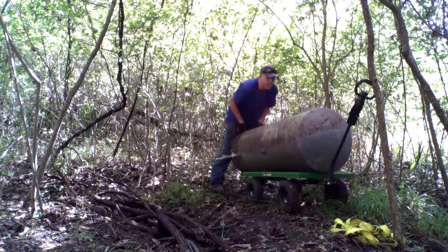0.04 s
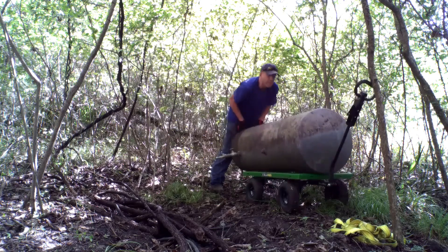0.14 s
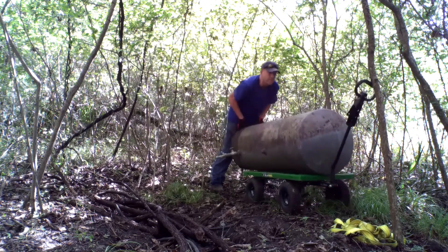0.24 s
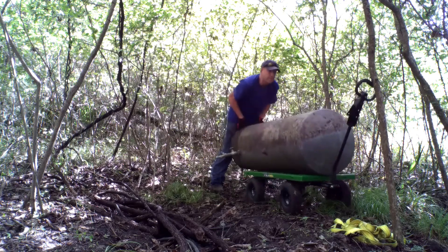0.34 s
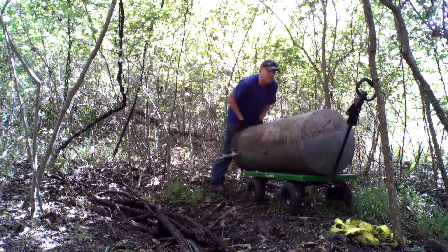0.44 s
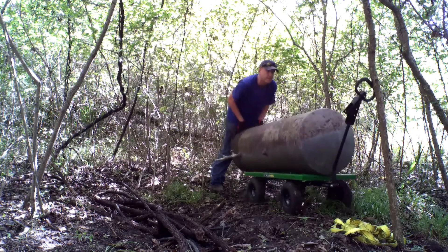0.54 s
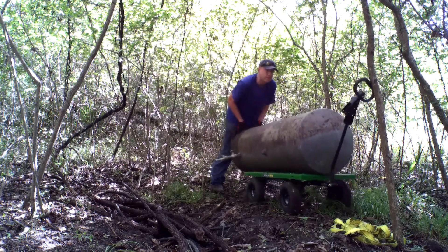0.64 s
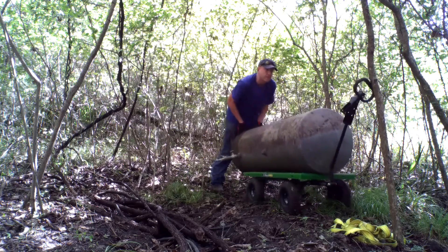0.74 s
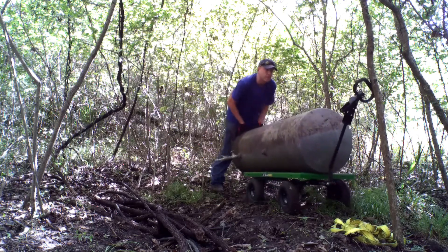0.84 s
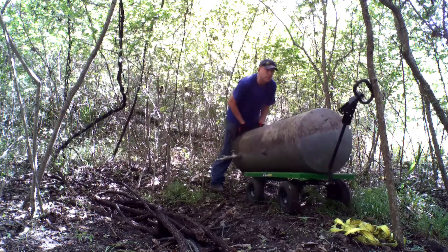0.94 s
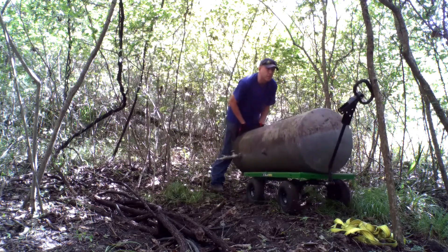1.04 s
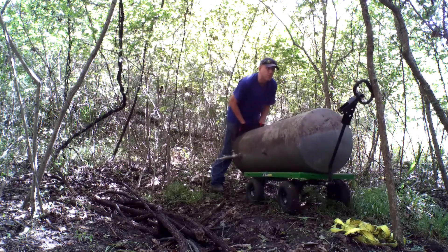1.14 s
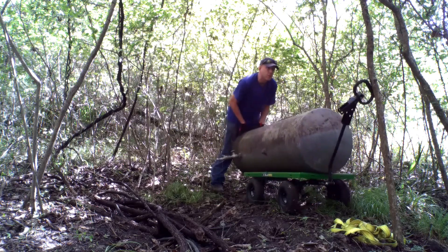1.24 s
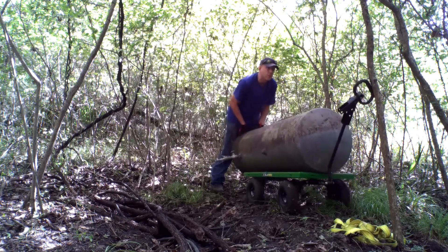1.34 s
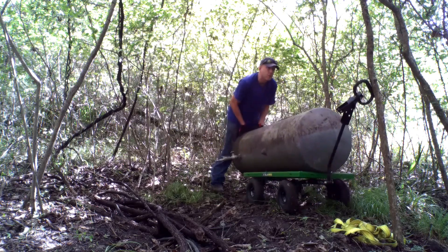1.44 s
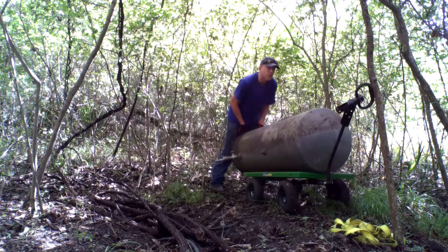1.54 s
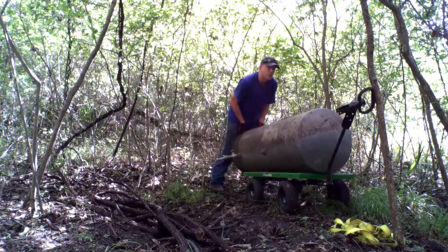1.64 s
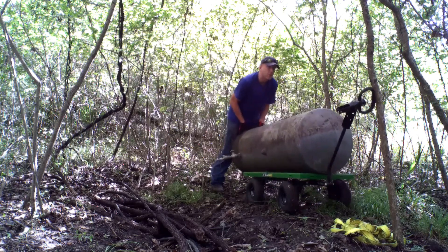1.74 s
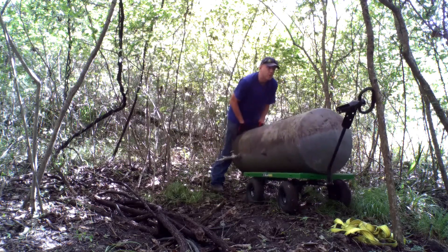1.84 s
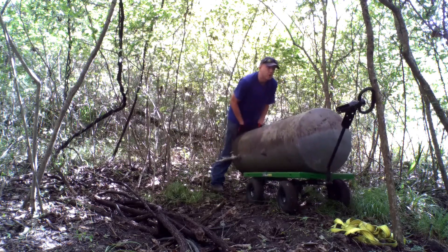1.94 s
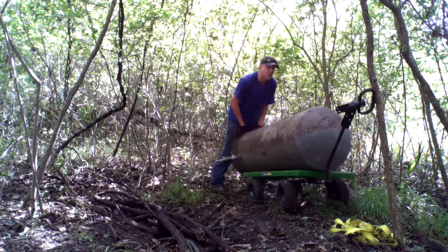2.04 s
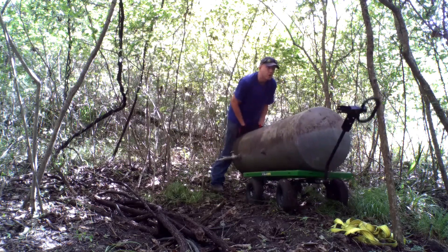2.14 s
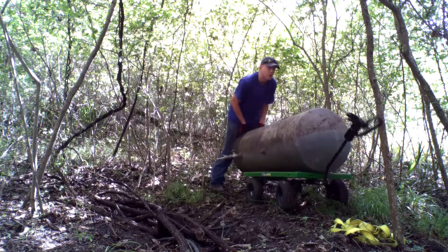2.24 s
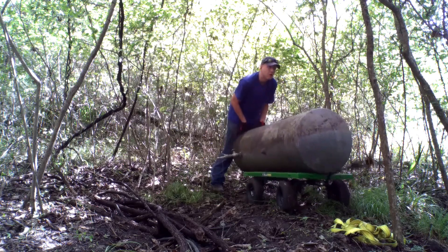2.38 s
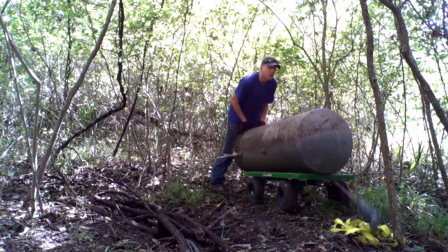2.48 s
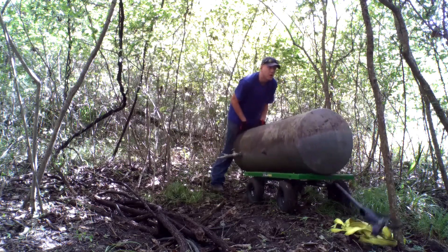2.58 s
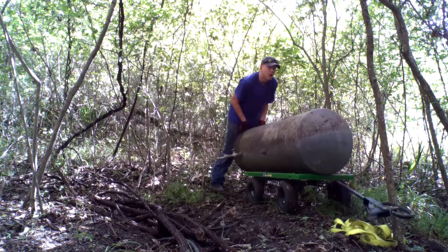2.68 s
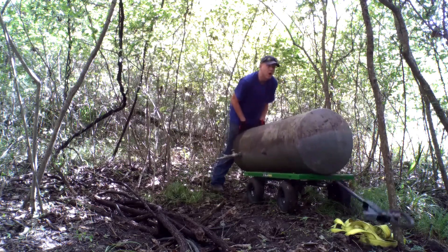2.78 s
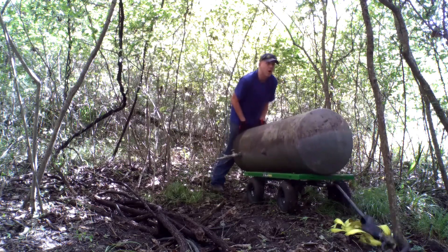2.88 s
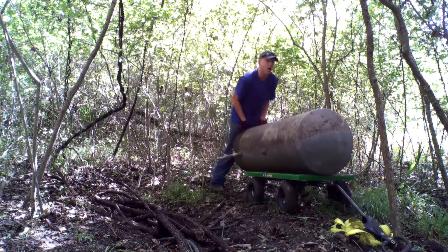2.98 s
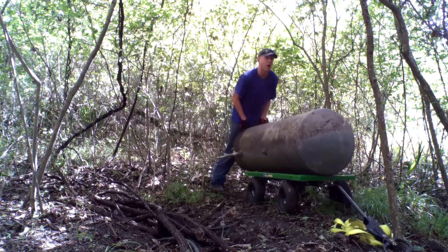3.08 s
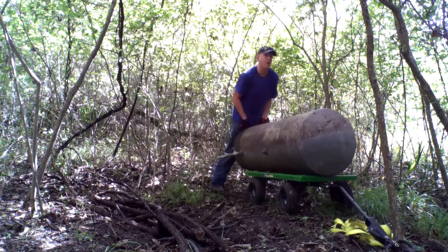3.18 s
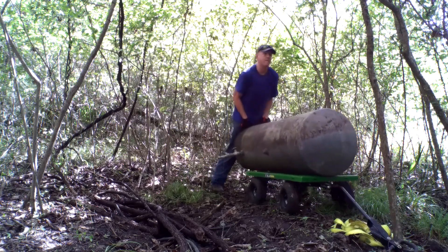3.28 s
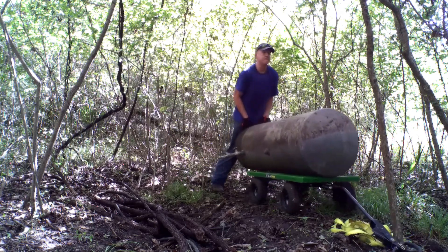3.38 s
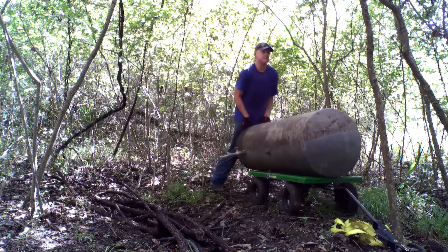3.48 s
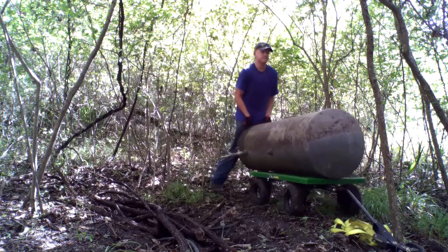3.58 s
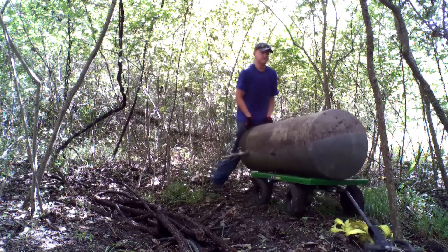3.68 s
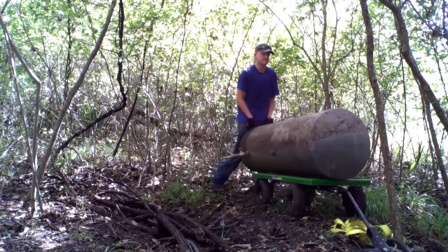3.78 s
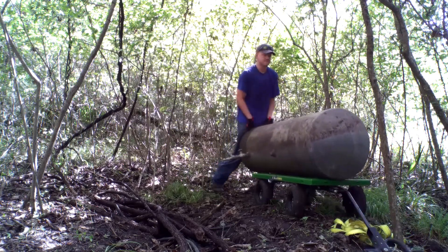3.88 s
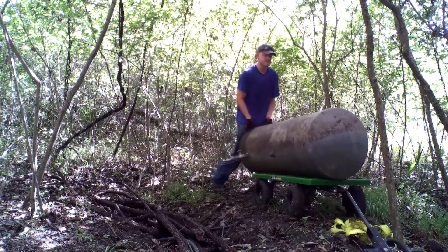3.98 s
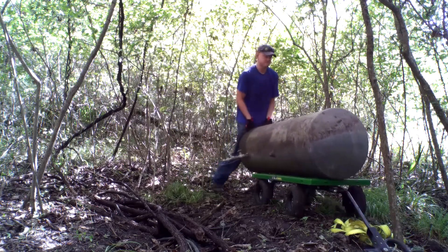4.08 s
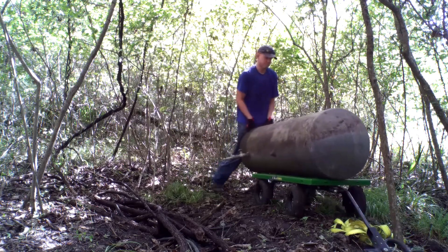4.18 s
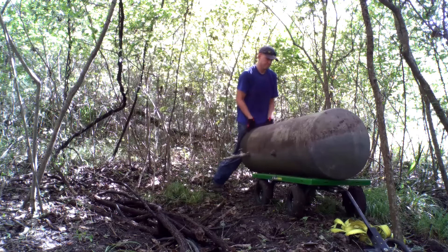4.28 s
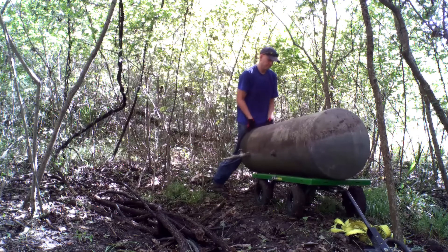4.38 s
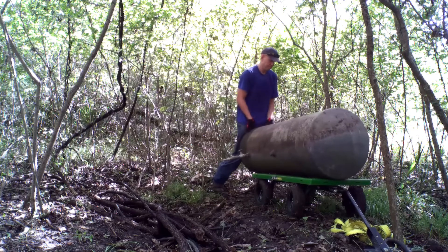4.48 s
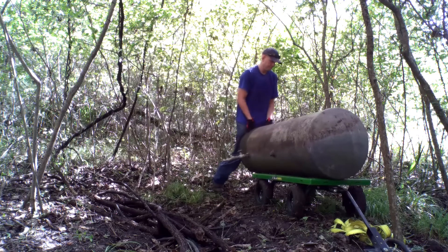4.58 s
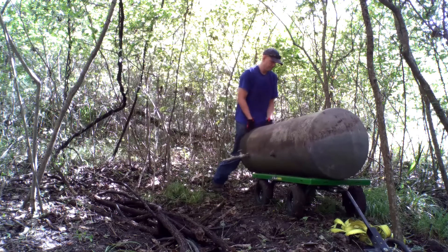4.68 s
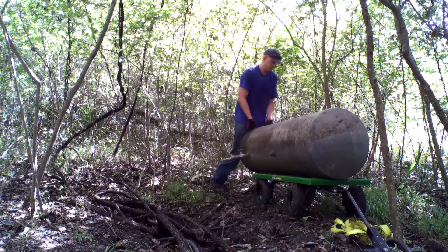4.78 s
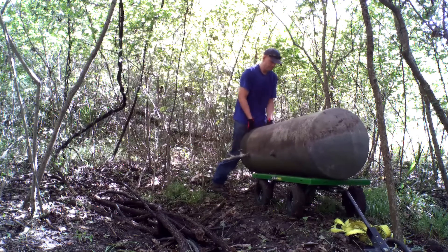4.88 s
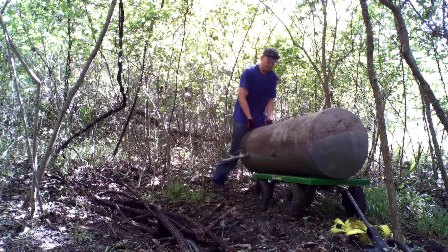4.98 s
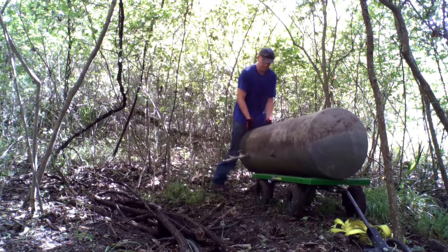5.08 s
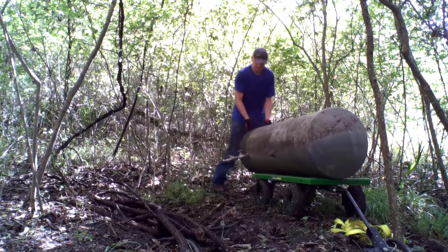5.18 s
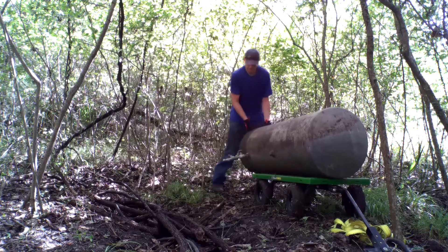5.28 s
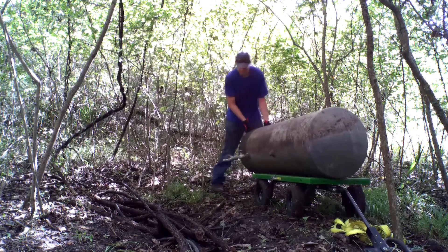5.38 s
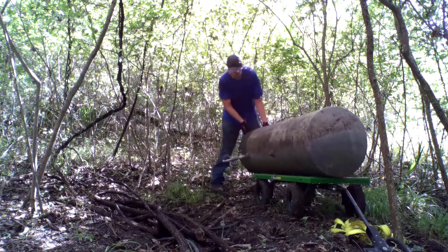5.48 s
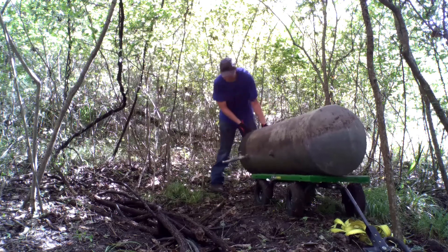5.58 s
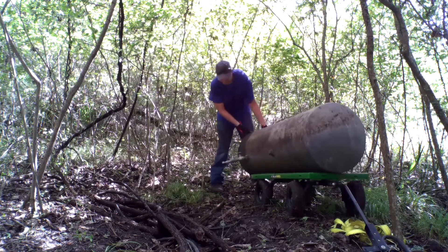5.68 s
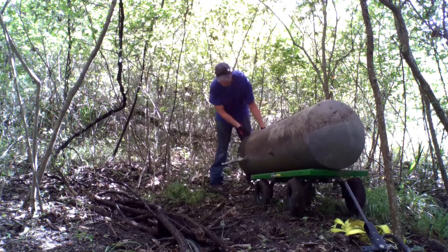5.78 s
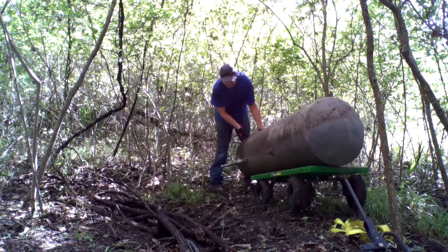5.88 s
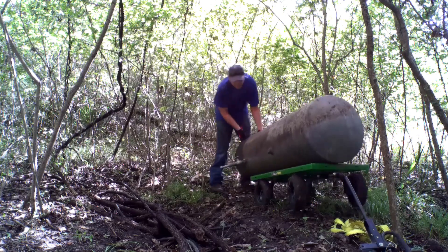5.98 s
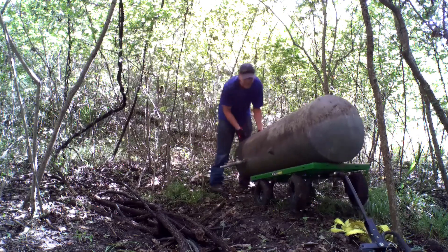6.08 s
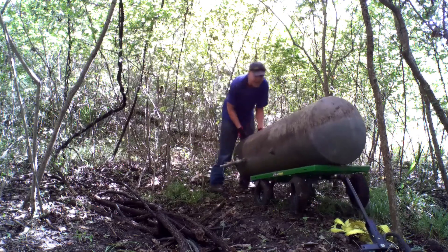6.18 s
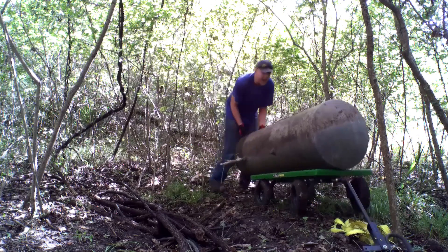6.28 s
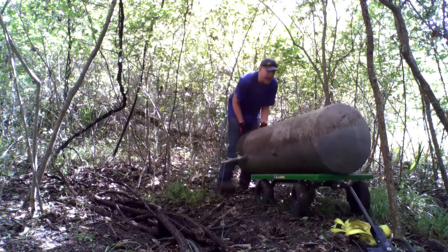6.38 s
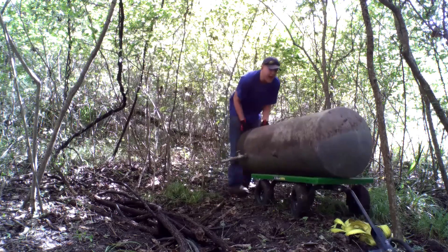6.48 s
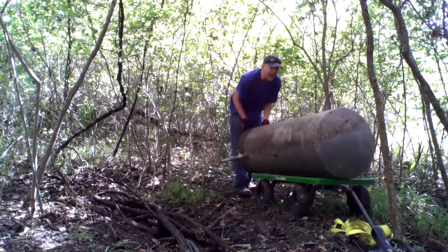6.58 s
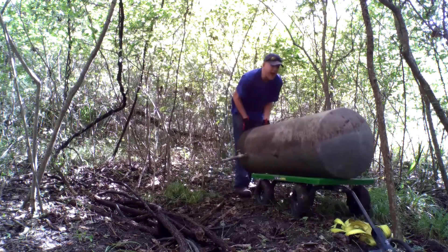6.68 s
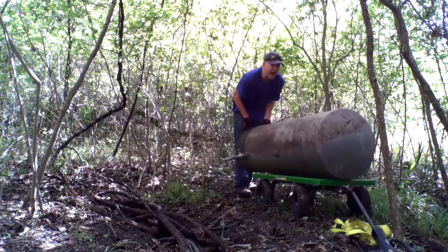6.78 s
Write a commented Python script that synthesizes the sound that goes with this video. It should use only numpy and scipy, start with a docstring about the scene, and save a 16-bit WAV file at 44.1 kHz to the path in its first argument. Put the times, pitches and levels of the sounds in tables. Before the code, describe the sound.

Outdoors among trees, faint rough metal scraping and squeaks, then a falling cart handle clangs sharply twice and clatters, followed later by dull metallic knocks.

```python
"""In a wood, a steel tank is shoved along a garden cart, scraping and squeaking faintly.
The cart's upright handle slips off the tank, swings down, clanks on its stop, rebounds and clatters to rest.
Later the tank tips and drops back on the deck. Blows are short noise bursts plus ringing sine waves;
scrapes and squeaks are uneven noise. The trees scatter the cart's sounds, over quiet hiss and a thin whine."""
import sys
import numpy as np
from scipy import signal
from scipy.fft import rfft, irfft, next_fast_len
from scipy.io import wavfile
from scipy.ndimage import uniform_filter1d

SR = 44100
rng = np.random.default_rng(int(sys.argv[2]) if len(sys.argv) > 2 else 0)


def int16_out(signal):
    """Quantize to a 16-bit WAV file."""
    q = np.round(np.clip(np.atleast_2d(signal).T, -1, 1) * 32767)
    wavfile.write(sys.argv[1], SR, q.astype(np.int16))


N = 301122  # length in samples


def amp(db):
    """Turns decibels into a gain."""
    return 10 ** (np.asarray(db) / 20)


def unit(x):
    """Scales a signal to an average strength (rms) of 1."""
    return x / np.sqrt(np.mean(x ** 2) + 1e-20)


def along(points, hz):
    """Reads a curve of (Hz, value) points, joined by straight lines on a log frequency axis."""
    f, v = np.transpose(points)
    return np.interp(np.log(hz + 1), np.log(f + 1), v)


def filtered(x, response):
    """Multiplies the spectrum of x by a gain that depends on frequency."""
    m = next_fast_len(len(x) + 4096)
    spectrum = rfft(x, m) * response(np.fft.rfftfreq(m, 1 / SR))
    return irfft(spectrum, m)[:len(x)]


def noise(size, colour):
    """Noise of rms 1 whose spectrum follows colour(Hz) in dB."""
    return unit(filtered(rng.standard_normal(size), lambda hz: amp(colour(hz))))


def narrow(size, centre_hz, width_hz):
    """Noise of rms 1 gathered around one frequency, heard as a fuzzy tone."""
    peak = lambda hz: 1 / (1 + (2 * (hz - centre_hz) / width_hz) ** 2)
    return unit(filtered(rng.standard_normal(size), peak))


def wobble(size, rate):
    """A random curve: straight lines between random points, rate points a second."""
    knots = rng.standard_normal(int(size * rate / SR) + 4)
    return np.interp(np.arange(size) * rate / SR, np.arange(len(knots)), knots)


def fade(t, t60):
    """Free decay: loses 60 dB in t60 seconds, or in 4 ms if t60 is shorter."""
    return np.exp(-np.log(1000) * t / max(t60, .004))


def hump(hz, centre_hz, width):
    """A bell over log frequency, reaching 1 near its centre."""
    return np.exp(-(np.log((hz + 1) / centre_hz) / width) ** 2)


def add(track, s, sound):
    """Lays a sound into the track at time s in seconds."""
    part = track[max(round(s * SR), 0):][:len(sound)]
    part += sound[:len(part)]


def background():
    """Low outdoor murmur of air and even hiss, both shaped noise, with a thin whine of narrow noise."""
    # spectrum of still air and hiss: f/Hz, level per Hz/dB
    air = [(12, -35), (20, -2), (107, -3), (141, -6), (299, -11), (325, -12.5), (374, -12.5), (537, -14),
           (840, -16.5), (1550, -18.5), (3200, -19.5), (3480, -20), (6990, -19.5), (10300, -18.5),
           (15700, -22.5)]
    # fuzzy lines of the whine: f/Hz, width/Hz, level/dB
    whine_lines = [(7654, 60, -80.5), (10460, 220, -78.5)]
    air_db = -65.5
    whine = sum(amp(db) * narrow(N, hz, width) for hz, width, db in whine_lines)
    return amp(air_db) * noise(N, lambda hz: along(air, hz)) + whine


def shove(s, length):
    """The tank gathers speed, slides evenly and slows down: gain over time."""
    rise_db_per_s, fall_db_per_s = 55, 35
    t = np.arange(N) / SR - s
    before, after = np.minimum(t, 0), np.maximum(t - length, 0)
    return amp(rise_db_per_s * before - fall_db_per_s * after)


def patchy(x, depth_db):
    """Shifting contact points feed some frequencies for a moment and starve others."""
    z = signal.stft(x, nperseg=512)[2]
    # random gains, smoothed over frequency and then over time
    field = uniform_filter1d(rng.standard_normal(z.shape), size=3, axis=0)
    field = uniform_filter1d(field, size=9, axis=1)
    return unit(signal.istft(z * amp(depth_db * unit(field)), nperseg=512)[1][:N])


def sliding():
    """The tank rubs over the deck in uneven slips, which catch on a few resonances and set the fittings buzzing."""
    # each shove slides the tank a little way:
    # t/s, length/s, rasp level before the final trim/dB, fittings' buzz against rasp/dB
    shoves = [(0, .5, -66, -2), (0.75, 0.18, -65.5, 1), (1.583, .06, -74.5, 3), (1.93, .05, -72, 5.5),
              (2.05, .37, -66.5, -4), (3.505, .23, -71, 3), (5.551, 0.51, -76, 1), (6.3, 0.25, -65, -2),
              (6.7, .13, -70, -1.5)]
    # spectrum of the rasp: f/Hz, level per Hz/dB
    rasp_colour = [(60, -11.5), (160, 1.5), (350, -2.5), (700, -4), (1200, -4), (1550, -1.5), (1850, -3),
                   (2350, -1), (3300, -5), (4300, -8), (9000, -17.5)]
    # resonances that the rubbing keeps catching on: f/Hz, level against the rasp/dB
    catch_points = [(1520, -13), (2330, -14), (3250, -11)]
    rasp_gain = np.max([amp(db) * shove(s, length) for s, length, db, _ in shoves], axis=0)
    buzz_gain = np.max([amp(db + buzz_db) * shove(s, length) for s, length, db, buzz_db in shoves], axis=0)
    # slow and fast unevenness together
    slips = amp(1.7 * wobble(N, rate=45) + 1.9 * wobble(N, rate=400))
    rasp = patchy(slips * noise(N, lambda hz: along(rasp_colour, hz)), depth_db=4.5)
    buzz = patchy(slips * narrow(N, centre_hz=6650, width_hz=1200), depth_db=1.0)
    catches = np.zeros(N)
    for hz, db in catch_points:
        grip = amp(9.1 * wobble(N, rate=16))
        catches += amp(db) * unit(grip * narrow(N, hz, width_hz=hz * 0.26))
    return amp(-0.5) * (rasp_gain * (rasp + catches) + buzz_gain * buzz)


def trees(x):
    """Trunks and leaves scatter the sound back: the answer builds up, then fades, with the bass lasting longest."""
    # how long the answer lasts: f/Hz, time to fade by 60 dB/s
    fade_times = [(100, 0.96), (500, .58), (2000, 0.43), (7000, 0.26), (14000, 0.37)]
    hz, t, z = signal.stft(rng.standard_normal(SR), SR, nperseg=256)
    decay = amp(-60 * t / along(fade_times, hz)[:, None])
    build_up = 1 - np.exp(-t / 0.021)
    tail = signal.istft(z * decay * build_up, SR, nperseg=256)[1]
    return signal.fftconvolve(x, tail / np.linalg.norm(tail))[:N]


def squeaks():
    """Short, uneven fuzzy tones: squeaks and groans of rubbed steel, and the ring of one light knock."""
    # short squeaks and groans of rubbed steel; the pair near 5.5 s is the ring of a light knock:
    # t/s, length/s, f/Hz, level before swelling in and out/dB
    moments = [(.03, .081, 1500, -66.5), (1.372, .11, 633, -68.5), (1.567, .092, 767, -69),
               (1.799, .079, 736, -72.5), (2.087, .07, 1600, -67.5), (2.325, .045, 1940, -57.5),
               (5.49, .10, 2300, -66), (5.50, .088, 1240, -69.5), (6.207, 0.074, 1480, -70),
               (6.547, .046, 3500, -65), (6.69, 0.053, 2470, -65)]
    track = np.zeros(N)
    for s, length, hz, db in moments:
        size = int(length * SR)
        swell = np.hanning(size) * unit(amp(2.2 * wobble(size, rate=140)))
        tone = unit(narrow(SR, hz, width_hz=hz * 0.15)[:size])
        add(track, s, amp(db) * swell * tone)
    return track


def crowded_modes(spacing_hz, depth_db):
    """Many close modes make a steel part's response jagged, alike for every blow: (Hz, dB) points."""
    hz = np.arange(0, SR / 2, spacing_hz)
    return np.column_stack([hz, depth_db * rng.standard_normal(len(hz))])


def ring(modes, t, scatter_db):
    """Free modes, struck at new strengths each time: fading sine waves that start at about rms 1 together."""
    chance = rng.standard_normal((len(modes), 2))
    sizes = amp(np.array(modes)[:, 1] + scatter_db * chance[:, 0])
    waves = []
    for (hz, _, t60), phase in zip(modes, chance[:, 1]):
        waves.append(np.sin(2 * np.pi * (hz * t + phase)) * fade(t, t60))
    return sizes @ np.array(waves) / np.sqrt(np.sum(sizes ** 2) / 2)


def blow(jagged, db, zing_hz, thud_db, clang_db, clang_hz, sizzle_db, chatter):
    """One contact: loose steel chatters briefly in its dense modes, while the strong modes ring on."""
    # strong modes of the handle tube and frame, of the steel yoke and its pin, and of the
    # cart's mesh deck: f/Hz, level within the part/dB, time to fade by 60 dB/s
    tube_modes = [(1556, -5.5, .24), (2100, -9, .28), (2125, -2.5, .27), (2450, -7, .42), (2805, -4.5, .33),
                  (3120, -6, 0.39), (3650, -2.5, .24), (4500, -4, .34), (5020, 0, 0.33), (5316, -2, .3),
                  (5760, -2.5, .32), (6200, -0.5, 0.26)]
    fitting_modes = [(6580, -3, 0.43), (6560, -1, 0.32), (6689, 1, .3), (6870, -1, 0.23), (6987, 0.5, .34),
                     (7360, -1, .32), (7252, -6.5, .34), (7360, -3, .3), (7558, 1, 0.19), (7850, -4, 0.19),
                     (7825, -4.5, .28), (8200, -10.5, 0.35), (8590, -13, .25)]
    deck_modes = [(366, -5, 0.37), (493.6, -2, .62), (638, -2.5, .35), (752.5, -2.5, .3)]
    # dense, quickly dying modes of deck, tube, fittings and thin treble: f/Hz, level per Hz/dB
    thud_colour = [(30, -35), (70, -14.5), (150, 0.5), (280, -5.5), (480, 0), (850, -1.5), (1200, -5),
                   (2000, -36)]
    clang_colour = [(600, -29.5), (1200, -5), (1560, 3), (1820, -5.5), (2120, 1), (2700, -1), (4300, -0.5),
                    (5600, 1), (7000, -35.5)]
    zing_colour = [(4000, -39.5), (5900, -7), (6650, -0.5), (7200, -4.5), (7650, -3.5), (8250, -7.5),
                   (8600, -10), (9300, -19.5), (11000, -41.5)]
    sizzle_colour = [(7500, -24), (9900, 9), (11300, -1), (12600, 1.5), (15500, -21)]
    size = SR // 2
    t = np.arange(size) / SR
    chatter_gain = fade(t, chatter) * amp(1.5 * wobble(size, rate=510))
    steel = lambda colour: chatter_gain * noise(size, lambda hz: colour(hz) + along(jagged, hz))
    pumped = np.sqrt(chatter)  # a longer chatter feeds more energy into the ring
    # the place of contact favours one region of the tube's and the fittings' modes
    tube = steel(lambda hz: along(clang_colour, hz) + 11 * hump(hz, clang_hz, width=.09))
    tube += amp(-7.0) * pumped * ring(tube_modes, t, scatter_db=2.5)
    fittings = steel(lambda hz: along(zing_colour, hz) + 6 * hump(hz, zing_hz, width=0.041))
    fittings += amp(-4.5) * pumped * ring(fitting_modes, t, scatter_db=1.5)
    deck = fade(t, chatter * 1.1) * noise(size, lambda hz: along(thud_colour, hz))
    deck += amp(-8.5) * pumped * ring(deck_modes, t, scatter_db=1.5)
    sizzle = steel(lambda hz: along(sizzle_colour, hz))
    # each part's own trim is added to the level asked for
    parts = amp(-9.0) * fittings + amp(clang_db - 4) * tube
    parts += amp(thud_db - 3.5) * deck + amp(sizzle_db - 4.5) * sizzle
    return amp(db) * parts * (1 - np.exp(-t / .0003))  # soft start


def rattle(s, length, db, zing_hz, clang_db, loss_db_per_s):
    """The loose handle strikes again and again, each contact weaker and duller than the last."""
    gap_s, jitter_s = .022, .002  # time from contact to contact, and its scatter
    clang_centre_hz, clang_scatter = 3800, .3  # each contact lands on another spot of the tube
    dulling = 0.45  # dB of tube clang gained against the fittings for each dB lost
    for k, (shift, spot) in enumerate(rng.standard_normal((8, 2))):
        delay = k * gap_s
        if delay < length:
            lost_db = loss_db_per_s * delay
            contact_s = s + delay + jitter_s * shift * (k > 0)
            clang_hz = clang_centre_hz * np.exp(clang_scatter * spot)
            yield contact_s, db - lost_db, zing_hz, clang_db + dulling * lost_db, clang_hz


def clanks():
    """All blows on the cart, each a chatter and a ring; the knocks bring out the deck more than the clanks do."""
    # levels below are set before each part's trim in blow(); tube, frame and sizzle are against the fittings
    # bright steel contacts, mostly the handle on the tank and on its stop: t/s, fittings level/dB,
    # fittings centre f/Hz, tube clang/dB, clang centre f/Hz, sizzle/dB, chatter's 60 dB fade/s
    bright_contacts = [(1.802, -42, 6500, -23, 3200, -34, 0.045), (1.940, -50, 6900, -10, 4500, -22, .04),
                       (2.155, -44.5, 7900, -7, 2500, -17, 0.055),
                       (2.219, -44.5, 7000, -14, 2200, -22, .04), (2.286, -47, 6600, -6, 2600, -21, 0.18),
                       (2.301, -40, 7195, -10, 2950, -14.5, 0.21),
                       (2.337, -49, 6650, -1, 1950, -21.5, 0.11),
                       (2.544, -6.5, 6310, -10, 5400, -23, 0.052),
                       (2.623, -20.5, 6910, -11.5, 4600, -21, 0.18),
                       (2.699, -22, 7230, -12.5, 5100, -28, 0.14),
                       (2.785, -41, 7223, -6, 4500, -22.5, 0.22), (2.863, -45, 7300, -9, 5150, -19.5, .26),
                       (2.904, -10.5, 6910, -5.5, 3500, -17, .085),
                       (2.917, -8.5, 6850, -22, 3600, -29, 0.08),
                       (2.925, -4, 7710, -21, 3700, -23.5, 0.031),
                       (2.950, -10, 7500, -22, 4450, -24.5, 0.078),
                       (3.036, -17, 6660, -5.5, 2100, -23.5, 0.044),
                       (3.047, -17.5, 6900, -17.5, 5400, -27.5, 0.1),
                       (3.069, -18.5, 7640, -13.5, 2300, -17, 0.14),
                       (3.120, -41, 7500, -1, 2200, -25.5, .05), (3.253, -30, 7470, -20, 2850, -25, 0.07),
                       (3.272, -40, 7350, -7, 5700, -20, .11), (5.511, -55.5, 6680, 0, 2250, -26, .18)]
    # knocks of the heavy tank on the deck, and first a light tick just before the handle's clank:
    # t/s, fittings level/dB, frame clang/dB, clang centre f/Hz, chatter's 60 dB fade/s
    knocks = [(2.538, -42, -2, 1600, 0.06), (3.548, -44, -4.5, 1510, 0.017), (3.745, -48, -5, 3020, 0.082),
              (3.753, -40.5, -10.5, 4600, 0.099), (6.398, -32.5, -16, 3800, .12),
              (6.422, -43.5, -6, 1390, 0.19), (6.443, -43.5, -11, 2330, 0.25),
              (6.480, -44, -4.5, 1500, 0.14), (6.498, -44.5, -10.5, 2980, 0.32)]
    # after a hard landing the handle rattles in its yoke: t/s, length/s, first contact level/dB,
    # fittings centre f/Hz, first tube clang/dB, loss/dB per s
    landings = [(2.551, .125, -17.5, 6730, -13, 62), (2.909, .12, -12.5, 7375, -18.5, 86.5)]
    # the deck's answer, against the clang
    clank_thud_db, knock_thud_db, rattle_thud_db = -14, -6.5, -14
    knock_zing_hz, knock_sizzle_db = 6730, -27
    rattle_chatter_s, rattle_sizzle_db = 0.21, -25
    track = np.zeros(N)
    jagged = crowded_modes(spacing_hz=40, depth_db=3.8)
    for s, db, zing_hz, clang_db, clang_hz, sizzle_db, chatter in bright_contacts:
        thud_db = clang_db + clank_thud_db
        add(track, s, blow(jagged, db, zing_hz, thud_db, clang_db, clang_hz, sizzle_db, chatter))
    for s, db, clang_db, clang_hz, chatter in knocks:
        thud_db = clang_db + knock_thud_db
        add(track, s, blow(jagged, db, knock_zing_hz, thud_db, clang_db, clang_hz, knock_sizzle_db, chatter))
    for landing in landings:
        for s, db, zing_hz, clang_db, clang_hz in rattle(*landing):
            thud_db = clang_db + rattle_thud_db
            add(track, s, blow(jagged, db, zing_hz, thud_db, clang_db, clang_hz,
                               rattle_sizzle_db, rattle_chatter_s))
    return track


def bumps():
    """The tyres cushion the tank's weight: a soft, low shudder of the whole cart, made of fading noise."""
    # the tank's weight lands on the deck and tyres: t/s, level before fading/dB, time to fade by 60 dB/s
    landings = [(2.30, -59.5, .35), (6.422, -56, 0.34), (6.484, -53.5, 0.26)]
    # spectrum of the shudder: f/Hz, level per Hz/dB
    shudder_colour = [(35, -16), (70, -6.5), (135, 3), (185, 0.5), (270, 0.5), (380, -6), (600, -10),
                      (1100, -25.5)]
    track, t = np.zeros(N), np.arange(SR) / SR
    for s, db, t60 in landings:
        swell = fade(t, t60) * (1 - np.exp(-t / .005))
        add(track, s, amp(db) * swell * noise(SR, lambda hz: along(shudder_colour, hz)))
    return track


def scene():
    """The cart, its answer from the trees and the quiet background, in one channel."""
    cart = clanks() + bumps() + sliding() + squeaks()
    return (cart + amp(-8.0) * trees(cart) + background())[None]


def record(dry):
    """Removes everything from the top frequency upwards."""
    top_hz = 15800
    return np.array([filtered(channel, lambda hz: hz < top_hz) for channel in dry])


dry = scene()
out = record(dry)
int16_out(out)
```